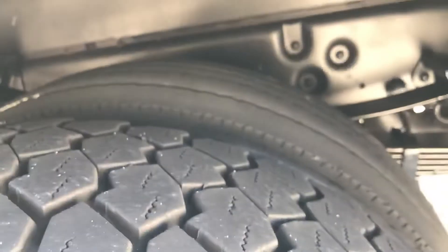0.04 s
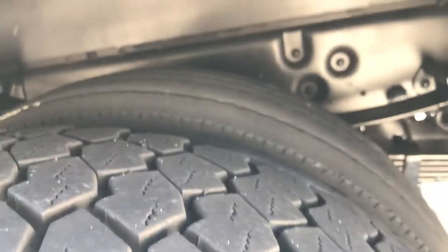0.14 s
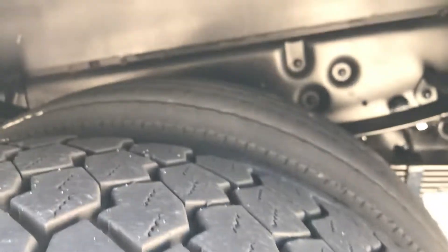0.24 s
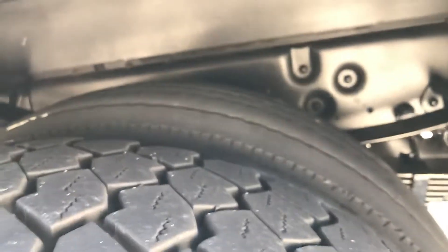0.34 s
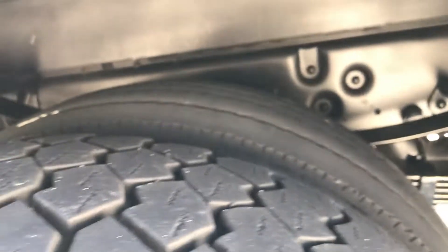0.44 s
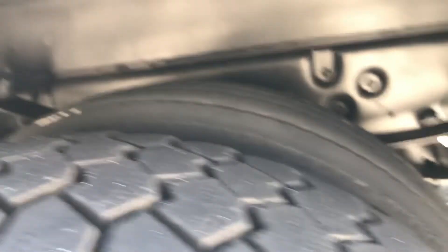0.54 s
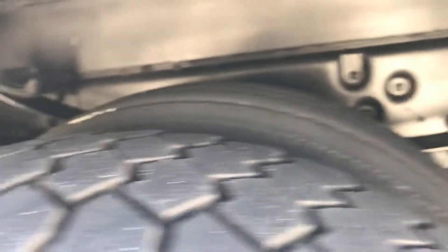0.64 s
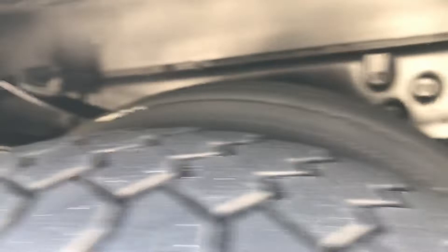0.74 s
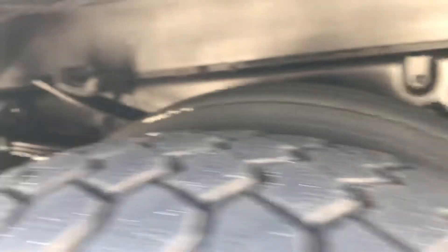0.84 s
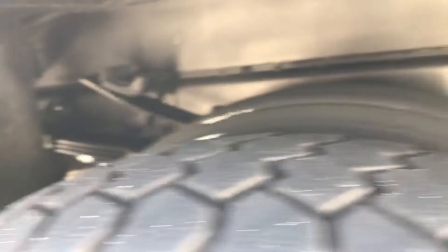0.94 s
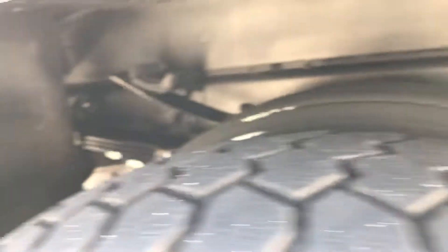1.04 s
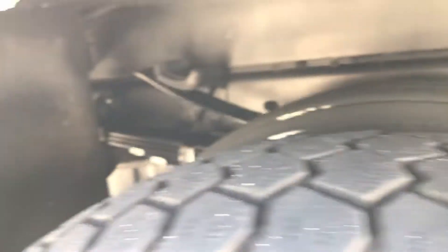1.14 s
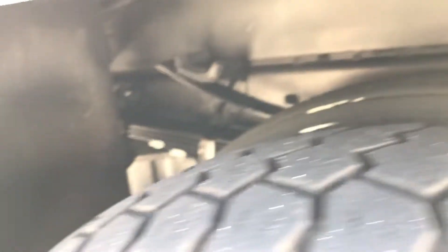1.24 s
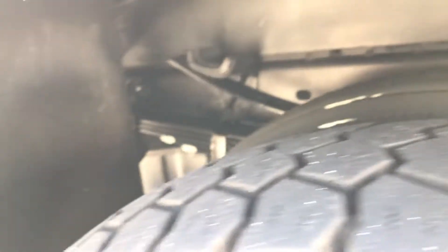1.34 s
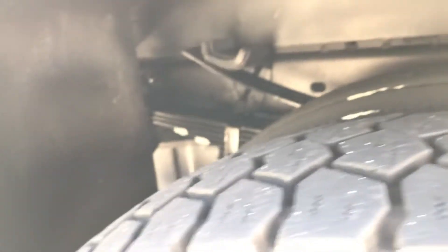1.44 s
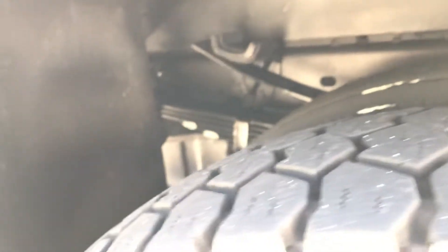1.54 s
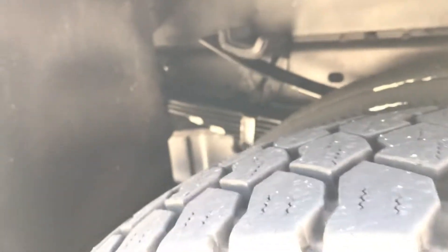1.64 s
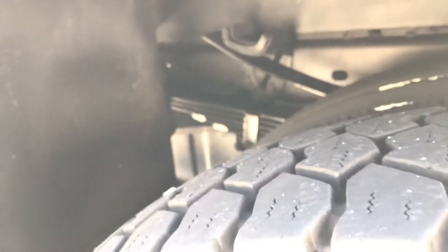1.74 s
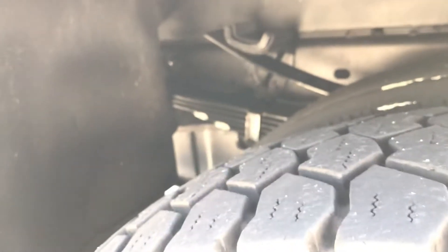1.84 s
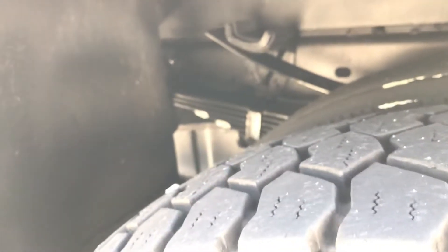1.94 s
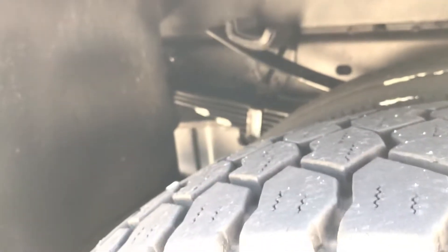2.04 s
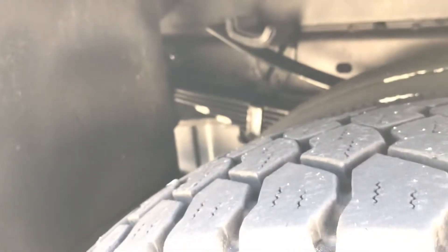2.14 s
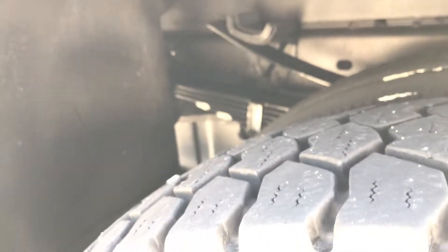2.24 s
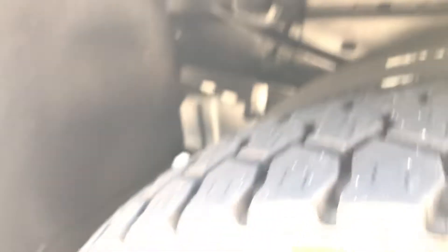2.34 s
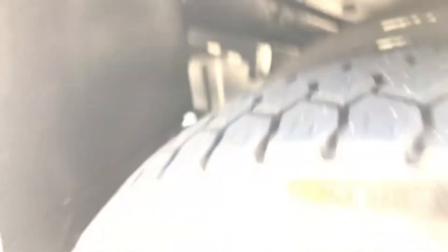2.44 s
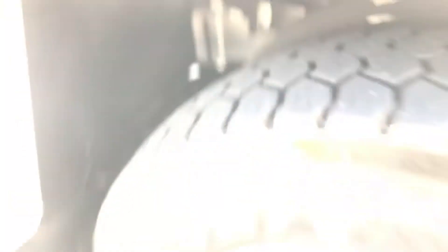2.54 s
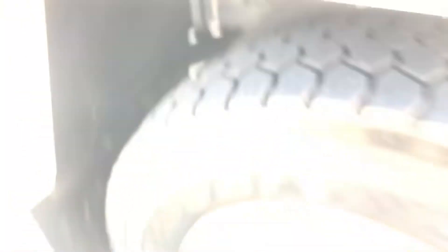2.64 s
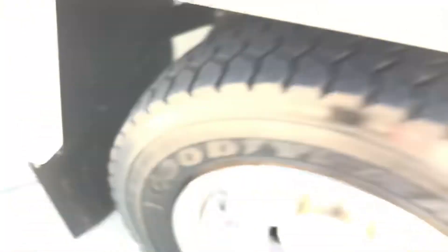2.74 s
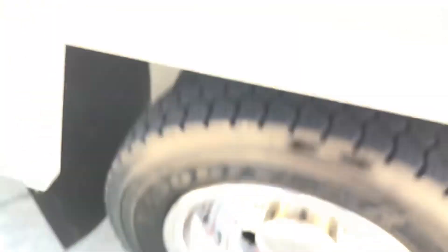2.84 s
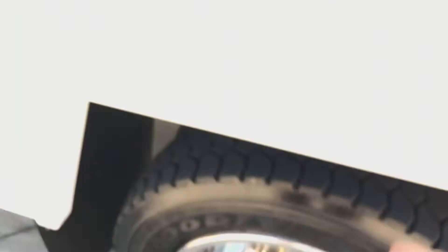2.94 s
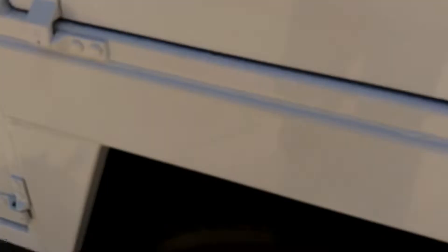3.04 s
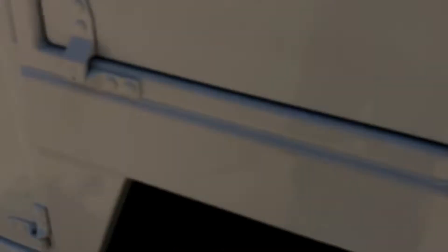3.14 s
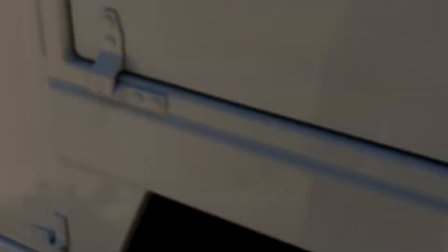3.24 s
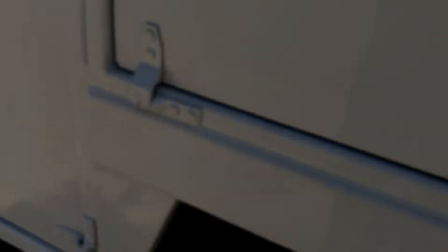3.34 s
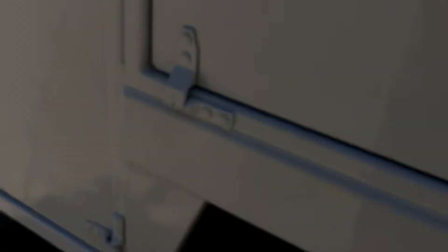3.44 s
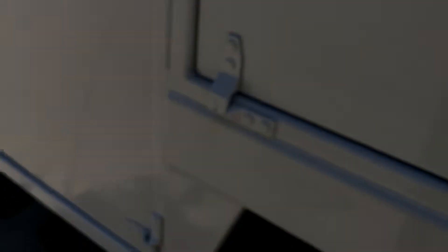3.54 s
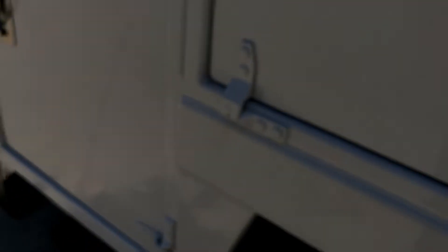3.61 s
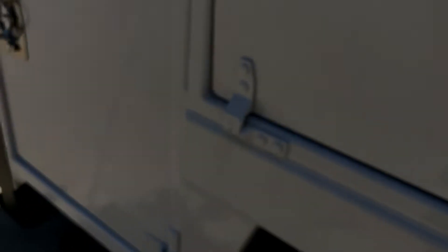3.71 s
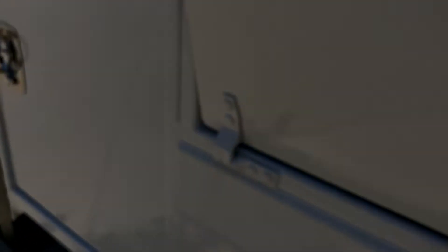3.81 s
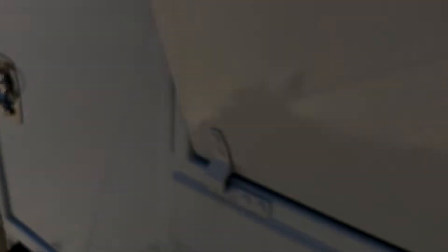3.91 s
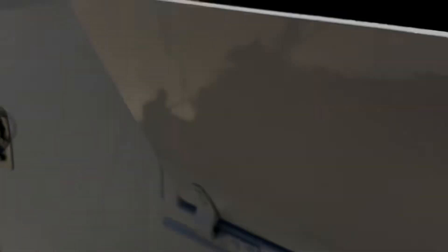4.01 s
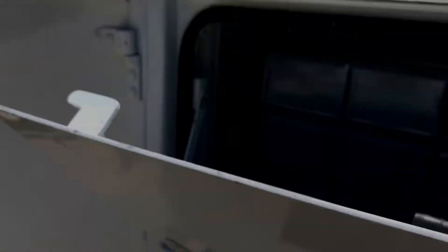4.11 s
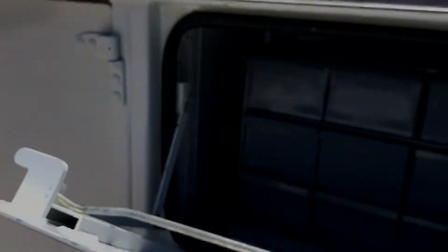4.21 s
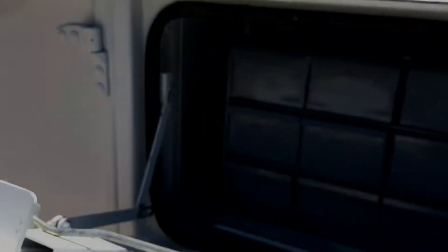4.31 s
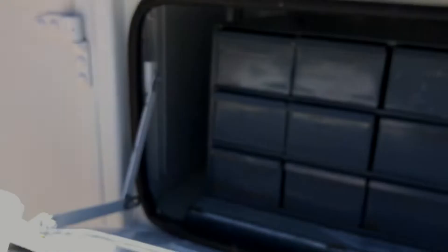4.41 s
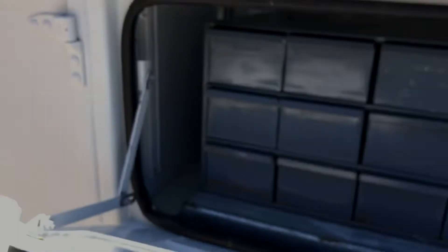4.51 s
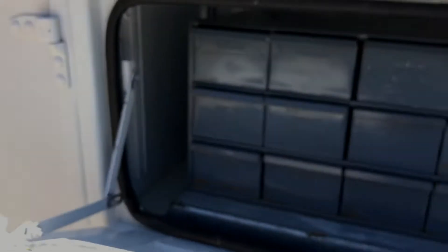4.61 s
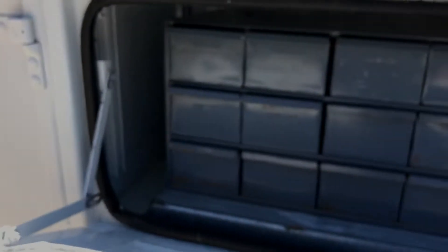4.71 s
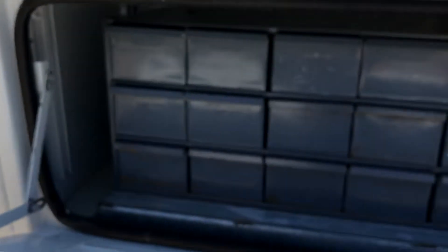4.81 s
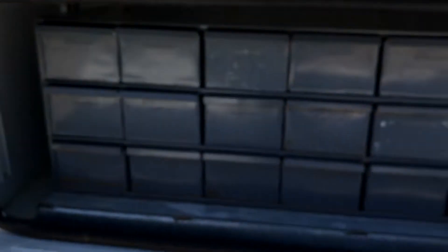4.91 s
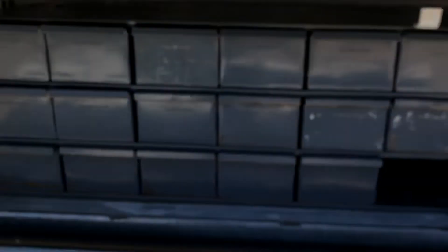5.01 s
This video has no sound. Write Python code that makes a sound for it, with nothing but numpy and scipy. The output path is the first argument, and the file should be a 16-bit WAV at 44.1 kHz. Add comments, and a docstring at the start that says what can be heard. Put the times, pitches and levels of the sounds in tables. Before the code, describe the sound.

A quiet outdoor yard with small birds whistling and chirping, near and far, and one distant echoing clack early on. Dull wind and handling bumps brush the handheld phone microphone. Past three seconds a close metal latch clicks, then snaps in a bright, dense clatter with hollow panel thumps. The door drops onto its stay with a lower thud and short squeak, followed by faint ticks and a fading yard echo.

```python
"""A hand works the latch of a metal side compartment on a parked truck: it snaps free and the door swings
down, thumps on its stay, and the stay squeaks. Contacts are filtered noise bursts that ring sheet-metal modes;
thuds are half-sine pushes into the door's low modes; the squeak is gated partials. All echo round the yard.
Birds whistle as gliding sines with wall and tree echoes; clacks from across the yard are ringing noise bursts.
Shaped noise gives still air, breeze, sleeve rustle and the buffets of air and hand on a phone's microphone."""
import sys
import numpy as np
from scipy import signal
from scipy.fft import rfft, irfft
from scipy.io import wavfile
from scipy.ndimage import uniform_filter1d

SR = 44100
rng = np.random.default_rng(int(sys.argv[2]) if len(sys.argv) > 2 else 0)


def wrap_up_sound(samples):
    """Save the sound to the file named by the first command line argument, as 16-bit audio."""
    columns = np.atleast_2d(samples).T
    # keep every value between -1 and 1, then stretch to whole-number steps
    tamed = np.clip(columns, -1, 1)
    steps = np.round(tamed * 32767).astype(np.int16)
    wavfile.write(sys.argv[1], SR, steps)


N = 223258
T = np.arange(N) / SR


def undb(db):
    """Level law: an amplitude gain is ten to the power of dB / 20."""
    return 10 ** (np.asarray(db) / 20)


def unit(x):
    """Normalisation of power: scale to rms 1."""
    return x / np.sqrt(np.mean(x ** 2))


def curve(rows):
    """Envelope: gain over time, interpolated in dB between rows of t/s, level/dB."""
    return undb(np.interp(T, *np.transpose(rows)))


def add(out, s, x):
    """Superposition: mix x into out from time s."""
    i = max(int(s * SR), 0)
    out[i:i + len(x)] += x[:max(N - i, 0)]


def ring(x, response):
    """Convolution: the response of a linear system to x."""
    return signal.fftconvolve(x, response)[:len(x)]


def colour(x, points, size=4096):
    """Minimum-phase filtering: a causal filter of unit energy through points of f/Hz, level/dB."""
    hz, db = np.transpose(points)
    f = np.maximum(np.fft.rfftfreq(size, 1 / SR), 1)
    log_gain = np.log(undb(np.interp(np.log(f), np.log(hz), db)))
    cepstrum = irfft(log_gain)
    # folding the cepstrum onto positive time makes the filter causal
    cepstrum[1:size // 2] *= 2
    cepstrum[size // 2 + 1:] = 0
    h = irfft(np.exp(rfft(cepstrum)))
    return ring(x, h / np.linalg.norm(h))


def noise(points, count=N):
    """Shaped random noise: white noise filtered to the given spectrum, at rms 1."""
    return unit(colour(rng.standard_normal(count), points))


def fade(t, t60):
    """Exponential decay: 60 dB down at t60."""
    return np.exp(-np.log(1000) * t / t60)


def modes(table):
    """Modal superposition: damped sines with alternating signs form an impulse response of unit energy."""
    t = T[:SR]
    h = np.zeros(len(t))
    for k, (hz, db, t60) in enumerate(table):
        h += (-1) ** k * undb(db) * fade(t, t60) * np.sin(2 * np.pi * hz * t)
    return h / np.linalg.norm(h)


def tail(points, t60, build_s):
    """Diffuse reverberation: shaped noise that builds up and dies away, with unit energy."""
    t = T[:2 * SR]
    h = noise(points, count=len(t)) * fade(t, t60) * (1 - np.exp(-t / build_s))
    return h / np.linalg.norm(h)


def jitter(count, size):
    """Low-pass random fluctuation: a smooth wander of rms 1, about size samples slow."""
    once = uniform_filter1d(rng.standard_normal(count), size)
    return unit(uniform_filter1d(once, size))


def bouts(rows, rise_s, fall_s):
    """Exponential swell and decay: gain that rises to each row's level, holds from start to end, and dies."""
    gain = np.zeros(N)
    for start, end, db in rows:
        before, after = np.minimum(T - start, 0), np.maximum(T - end, 0)
        gain += undb(db) * np.exp(before / rise_s - after / fall_s)
    return gain


def whistle(hz, gain, waver):
    """Frequency modulation: a near-sine note with soft ends, wavering in pitch and broken up in strength."""
    wobble = 1 + waver * jitter(len(hz), size=130)
    gain = gain * undb(2.8 * jitter(len(hz), size=350))
    tone = np.sin(2 * np.pi * np.cumsum(hz * wobble) / SR)
    return tone * gain * signal.windows.tukey(len(hz), .35)


# held bird notes, and one short tick near 1.6 kHz:
# [start t/s, length t/s, nominal f/Hz, relative level/dB]
LEVEL_TONES = [(0.008, 0.098, 2528, -58), (0, 0.19, 3464, -70.5), (0.133, 0.016, 2660, -60.5),
               (0.239, 0.036, 4025, -64), (0.384, 0.044, 4060, -67.5), (0.409, 0.036, 2750, -68.5),
               (0.996, 0.039, 4117, -64.5), (1.196, 0.042, 4080, -69.5), (1.409, 0.027, 4194, -65.5),
               (1.519, 0.12, 7330, -71), (2.794, 0.012, 1640, -60.5)]
# arched notes of one bird: [t/s, relative level/dB]
ARCHED_NOTES = [(2.797, -64), (3.0, -63), (3.197, -61.5), (3.384, -65)]
# chirps that drop fast and level out: [start t/s, length t/s, start f/Hz, end f/Hz, relative level/dB]
FALLING_CHIRPS = [(0.273, 0.12, 7040, 5560, -59), (0.51, 0.039, 2020, 1930, -66),
                  (1.01, 0.0256, 3400, 2650, -70), (1.093, 0.049, 2750, 1970, -68),
                  (1.356, 0.043, 4100, 2480, -65.5), (1.444, 0.07, 2900, 2050, -63.5),
                  (1.565, 0.034, 2230, 1855, -69)]
# a small bird's thin rising calls: [t/s]
RISING_PEEPS = [.195, .555, .765, 1.165, 1.365]
# a second bird's falling notes, mostly in pairs: [t/s, relative level/dB]
FALLING_SLURS = [(1.747, -72.5), (1.825, -69), (2.066, -65), (2.137, -62.5), (2.337, -63.5), (2.408, -62),
                 (2.636, -69), (2.705, -65), (2.932, -67.5), (3.0, -63.5), (3.194, -64.5), (3.435, -66.5)]
ARCH_S, ARCH_HZ, ARCH_SAG_HZ = 0.051, 2530, 307  # length, top pitch, drop at both ends
SLUR_S, SLUR_TOP_HZ, SLUR_END_HZ = .132, 4420, 1660
SLUR_BEND = 0.513  # how much steeper the fall is halfway


def calls():
    """Tones and glides: near birds sing held notes, arches, chirps, peeps and slurs, and one tick sounds."""
    song = np.zeros(N)
    for s, length, hz, db in LEVEL_TONES:
        add(song, s, whistle(np.full(int(length * SR), hz), undb(db), waver=0.0075))

    arch = ARCH_HZ - ARCH_SAG_HZ * np.linspace(-1, 1, int(ARCH_S * SR)) ** 2
    for s, db in ARCHED_NOTES:
        add(song, s, whistle(arch, undb(db), waver=.006))

    for s, length, start, end, db in FALLING_CHIRPS:
        left = np.linspace(1, 0, int(length * SR))
        add(song, s, whistle(end + (start - end) * left ** 2, undb(db), waver=0.015))

    for s in RISING_PEEPS:
        add(song, s, whistle(np.linspace(7050, 8050, SR // 25), undb(-73.5), waver=0.031))

    u = np.linspace(0, 1, int(SLUR_S * SR))
    fall = u - SLUR_BEND * np.sin(2 * np.pi * u) / (2 * np.pi)
    slur = SLUR_TOP_HZ + (SLUR_END_HZ - SLUR_TOP_HZ) * fall
    for s, db in FALLING_SLURS:
        add(song, s, whistle(slur, undb(db), waver=.028))
    return song


# spectrum of the far bird chorus: [f/Hz, level/dB]
CHORUS_SPECTRUM = [(1200, -20), (1900, -4.5), (2700, -7.5), (3200, -5), (4000, -3.5), (4800, -6.5)]


def chorus(count):
    """Incoherent summation: many short far chirps overlap, half clear and half smeared into a wash."""
    out = np.zeros(N)
    for when, pitch, length, glide, distance in rng.random((count, 5)):
        u = np.linspace(-1, 1, int(0.02 * (1 + length) * SR))
        hz = (1700 + 2700 * pitch) * (1 + 0.19 * (glide - .5) * u)
        add(out, when * N / SR, whistle(hz, undb(-9 * distance), waver=.02))
    # played twice, keeping the second pass, so the wash is already full at the start
    smeared = ring(np.tile(out, 2), tail(CHORUS_SPECTRUM, t60=0.92, build_s=0.0025))[N:]
    clear = colour(out, CHORUS_SPECTRUM)
    return unit(unit(smeared) + unit(clear))


# spectrum of the birds' echoes: [f/Hz, level/dB]
BIRD_ECHO_SPECTRUM = [(1000, 1), (9000, -9.5)]
# bouts of the far chorus: [start t/s, end t/s, relative level/dB]
CHORUS_BOUTS = [(-.1, .03, -56), (.43, .58, -62.5), (.62, .82, -63), (2.3, 3.7, -68.5)]
CHORUS_LULL_DB, BOUT_RISE_S, BOUT_FALL_S = -75.5, 0.091, 0.065  # lull level is relative, like the bouts


def birds():
    """Reflection and scattering: walls and trees echo the calls, over a far chorus that comes in bouts."""
    song = calls()
    walls = ring(song, tail(BIRD_ECHO_SPECTRUM, t60=0.077, build_s=0.0017))
    trees = ring(song, tail(BIRD_ECHO_SPECTRUM, t60=0.58, build_s=0.0016))
    strength = undb(CHORUS_LULL_DB) + bouts(CHORUS_BOUTS, BOUT_RISE_S, BOUT_FALL_S)
    far = chorus(count=450) * strength
    return undb(0.34) * song + undb(-5.0) * walls + undb(-3) * trees + undb(-5.5) * far


# spectrum of still air: [f/Hz, level/dB]
AIR_SPECTRUM = [(20, -6), (70, -2.5), (240, -10), (500, -23), (1500, -30.5), (7000, -38), (16000, -44.5)]
# strength of the breeze rumble: [t/s, relative level/dB]
BREEZE_LEVEL = [(0.0, -59.5), (0.32, -65), (1.36, -59), (2.52, -52), (2.98, -54), (3.29, -46),
                (3.81, -43.5), (4.15, -56.5), (5.05, -50)]
# spectrum of the breeze rumble: [f/Hz, level/dB]
BREEZE_SPECTRUM = [(20, -23.5), (55, 7.5), (90, -3.5), (160, -6.5), (280, -10), (500, -25.5), (1200, -62.5)]
# the sleeve moves: [start t/s, end t/s, relative level/dB]
SLEEVE_MOVES = [(2.66, 3.35, -66), (3.5, 3.95, -61)]
SLEEVE_RISE_S, SLEEVE_FALL_S = 0.072, 0.26


def outdoors():
    """Broadband noise: steady still air, a low gusting breeze and the rustle of a sleeve."""
    cloth = noise([(400, -3.0), (1500, 4.0), (6000, -7.0), (15000, -15.0)])
    rustle = cloth * undb(2 * jitter(N, size=300))
    gusts = undb(2 * jitter(N, size=1500))
    breeze = undb(3.5) * curve(BREEZE_LEVEL) * gusts * noise(BREEZE_SPECTRUM)
    sleeve = bouts(SLEEVE_MOVES, SLEEVE_RISE_S, SLEEVE_FALL_S) * rustle
    return undb(-57.5) * noise(AIR_SPECTRUM) + breeze + sleeve


# clacks from across the yard: [t/s, relative level/dB]
CLACK_TIMES = [(0.844, -41.5), (2.209, -58)]
# spectrum of a clack's burst: [f/Hz, level/dB]
CLACK_SPECTRUM = [(650, -37), (950, -14.5), (1500, -18.5), (2500, -20), (3400, -12.5), (5700, -9.5),
                  (16000, -34)]
# resonances of the clacks: [f/Hz, level/dB, t60 t/s]
CLACK_RESONANCES = [(1720, -1, 0.39), (3434, -5, 0.27), (4840, -16, .23), (5950, -7, .18), (8538, -20, .2)]


def clacks():
    """Propagation and reverberation: distant knocks arrive smeared, with a longer and duller echo."""
    t, out = T[:SR], np.zeros(N)
    for s, db in CLACK_TIMES:
        burst = noise(CLACK_SPECTRUM, count=SR) * np.clip(t / 0.0059, 0, 1) * fade(t, 0.2)
        rung = unit(ring(burst, modes(CLACK_RESONANCES))) * burst.std()
        wash = noise([(600, -50), (1000, -5.5), (1600, -4.5), (3500, -14.5), (9000, -62)], count=SR)
        echo = wash * np.clip(t / 0.02, 0, 1) * fade(t, 0.55)
        add(out, s, undb(db) * (burst + undb(-4.5) * rung + undb(-7.5) * echo))
    return out


# buffets on the microphone: [centre t/s, level/dB, Gaussian half length t/s, upper edge f/Hz]
MIC_BUFFETS = [(1.257, -43.5, 0.01, 205), (1.32, -35.5, 0.0036, 295), (1.768, -31, 0.014, 255),
               (1.791, -29, 0.0055, 340), (1.824, -31.5, 0.021, 310), (2.104, -36.5, 0.0068, 265),
               (2.486, -41.5, 0.059, 162), (2.674, -35.5, 0.03, 227), (2.745, -37, 0.018, 216),
               (3.089, -29, 0.016, 139), (3.212, -24, 0.015, 204), (3.247, -30, 0.017, 370),
               (3.471, -35.5, 0.014, 132), (5.012, -38.5, 0.024, 167)]


def buffets():
    """Turbulent pressure: short dull bursts of low noise swell and sink on the microphone port."""
    out, t = np.zeros(N), T[:SR // 2] - 1 / 4
    for s, db, half, edge_hz in MIC_BUFFETS:
        swell = np.exp(-.5 * (t / half) ** 2)
        low_band = [(25, -16), (70, 0), (edge_hz / 2, 0), (edge_hz, -6)]
        roll_off = [(edge_hz * 1.805, -25), (edge_hz * 4, -75)]
        eddy = swell * noise(low_band + roll_off, count=len(t))
        add(out, s + t[0], undb(db) * eddy * swell.std() / eddy.std())
    return out


def contact_burst(decay_s, grain_db, sing_db):
    """Stick-slip friction: a shower of uneven slips briefly sings at pitches set by the spot that rubs."""
    t = T[:SR // 6]
    slips = rng.standard_normal(len(t)) * undb(grain_db * jitter(len(t), size=20))
    pitches = np.geomspace(2000, 15000, num=12) * np.exp(0.13 * rng.standard_normal(12))
    spot = modes([(hz, 0, .014) for hz in pitches])
    slips = unit(slips) + undb(sing_db) * unit(ring(slips, spot))
    onset = 1 - np.exp(-t / (.14 * decay_s))  # long contacts also start more softly
    slips = slips * np.exp(-t / decay_s) * onset
    return slips * np.sqrt(decay_s * SR / 2) / np.linalg.norm(slips)


# blows of latch and door: [t/s, relative level/dB, brightness level/dB per octave]
METAL_BLOWS = [(3.282, -27, -.5), (3.291, -28.5, -3.5), (3.422, -45, -6.5), (3.5177, -23, -2.5),
               (3.5945, -14.5, 0), (3.613, -19, -1.5), (3.6205, -11, 2.5), (3.629, -17, 4),
               (3.652, -32, -.5), (3.799, -40, -3), (3.865, -29.5, -0.5), (3.918, -21.5, 1.5)]
# scrapes and light ticks of bolt, hinge and stay:
# [t/s, relative level/dB, decay t/s, brightness level/dB per octave]
SCRAPES_AND_TICKS = [(3.274, -36.5, 0.0069, -7.5), (3.54, -42.5, 0.012, -1), (3.572, -36.5, 0.034, -2.5),
                     (3.5865, -18, 0.019, -0.5), (3.602, -20.5, 0.017, 7), (3.688, -39, 0.0059, -1),
                     (3.852, -44.5, 0.013, -0.5), (3.890, -31.5, 0.017, -2), (3.906, -33, 0.0057, 1),
                     (3.984, -32.5, 0.0068, -1.5), (4.005, -31.5, 0.0068, -2.5), (4.120, -49.5, 0.021, -3),
                     (4.142, -41, 0.015, -4), (4.195, -51.5, 0.07, -9), (4.272, -53.5, 0.0063, -1.5),
                     (4.422, -57, 0.01, -4.5)]
BLOW_DECAY_S, REBOUND_S, REBOUND_DB = 0.0043, .009, -12  # a rebound follows its blow, at a lower level


def contacts():
    """Impact and rebound: lists each blow, its weaker bounce and each scrape or tick as a metal contact."""
    rows = list(SCRAPES_AND_TICKS)
    for s, db, tilt in METAL_BLOWS:
        rows.append((s, db, BLOW_DECAY_S, tilt))
        rows.append((s + REBOUND_S, db + REBOUND_DB, BLOW_DECAY_S, tilt))
    return rows


# modes of sheet metal and latch: [f/Hz, level/dB]
SHEET_MODES = [(328, 6), (1199, -2), (1360, -4.5), (1444, 5), (1504, -3.5), (1749, 0), (1894, -4.5),
               (1958, -3.5), (2080, -3), (2207, 0), (2292, 3.5), (2566, -1.5), (2826, 0), (3238, -2),
               (3551, -2), (3625, 1), (4516, -0.5), (5609, 2), (5880, -1.5), (6594, 2), (7198, 3.5),
               (12100, 8), (15600, 4.5)]
# spectrum of a contact's crack, before its brightness tilt: [f/Hz, level/dB]
CRACK_SPECTRUM = [(120, -15.5), (330, -8.5), (850, -13), (1400, -6.5), (2300, -8), (3700, -10),
                  (4400, -11.5), (4950, -14.5), (6600, -13.5), (7600, -22), (8150, -18), (9300, -22.5),
                  (16000, -27.5)]
# spectrum of the chattering panels: [f/Hz, level/dB]
RATTLE_SPECTRUM = [(330, 3.5), (650, 4.5), (1400, 0.5), (3000, -5.5), (7000, -14), (15000, -17.5)]
METAL_T60_S, METAL_DAMPING = 0.16, 0.36  # ring time at 1 kHz; higher modes die sooner by this power of frequency


def latch():
    """Impulsive excitation: contacts crack; the harder ones ring the sheet metal, and the panels chatter on."""
    force, shake = np.zeros(N), np.zeros(N)
    hardest = max(row[1] for row in METAL_BLOWS)
    for s, db, decay_s, tilt in contacts():
        hardness = [(hz, tilt * np.log2(hz)) for hz in (400, 14000)]
        crack = colour(contact_burst(decay_s, grain_db=4.0, sing_db=-6.5), CRACK_SPECTRUM)
        blow = colour(crack, hardness)
        blow = undb(db) * blow * np.sqrt(decay_s * SR / 2) / np.linalg.norm(blow)
        add(force, s, blow)
        add(shake, s, blow * undb(0.71 * (db - hardest)))  # weak contacts barely shake the sheet

    sheet = modes([(hz, db, METAL_T60_S * (hz / 1000) ** -METAL_DAMPING) for hz, db in SHEET_MODES])
    metal = unit(ring(shake, sheet)) * force.std()
    loose = undb(3 * jitter(N, size=100))
    chatter = loose * ring(force, tail(RATTLE_SPECTRUM, t60=0.2, build_s=0.0076))
    return undb(3) * force + undb(-6.5) * metal + undb(-13.5) * chatter


# shoves that thump the whole door: [t/s, relative level/dB, push length t/s]
DOOR_SHOVES = [(3.284, -23.5, 0.0016), (3.423, -23, 0.0032), (3.518, -17.5, 0.0017), (3.593, -19.5, 0.0028),
               (3.6163, -13, .0016), (3.647, -13, 0.003), (3.801, -18.5, 0.0036), (3.919, -13, .0008),
               (3.991, -25.5, 0.0044)]
# low modes of the door in its frame: [f/Hz, level/dB, t60 t/s]
SHUT_DOOR_MODES = [(79.8, -1, 0.49), (138, -2, 0.15), (219.6, 2, 0.095), (324.9, 3, .17), (490, 0, 0.032)]
# low modes of the door once it hangs free: [f/Hz, level/dB, t60 t/s]
FREE_DOOR_MODES = [(55.15, -2.5, 0.24), (141.4, -0.5, 0.1), (250, -1.5, 0.053), (418, 1.5, .04),
                   (557, 0.5, 0.025)]
DOOR_FREE_S = 3.75  # shoves from here on sound the free door


def thuds():
    """Forced modal response: half-sine pushes boom in the door, deeper when free; longer pushes are duller."""
    out = np.zeros(N)
    for s, db, length in DOOR_SHOVES:
        push = np.sin(np.pi * np.minimum(T[:SR] / length, 1))
        body = modes(SHUT_DOOR_MODES if s < DOOR_FREE_S else FREE_DOOR_MODES)
        add(out, s, undb(db) * ring(push / push.sum(), body / np.abs(body).max()))
    return out


# partials of the squeaking stay: [nominal f/Hz, level/dB]
STAY_PARTIALS = [(1109, -19.5), (1812, -1), (2089, -17.5), (2750, -17)]
SLIP_S = .0135  # time from one slip of the pivot to the next


def squeak(s, db, second_db, ring_db, t60):
    """Stick-slip oscillation: the stay's pivot slips twice and sings on partials that ring on briefly."""
    t = T[:SR // 6]
    first, second = (np.exp(-(2 * (t / SLIP_S - k) - 1) ** 4) for k in range(2))
    slips = first + undb(second_db) * second
    after = ring(slips, fade(t, t60)) / slips.sum()
    tone = np.zeros(len(t))
    for hz, part_db in STAY_PARTIALS:
        pitch = hz * (1 + .014 * jitter(len(t), size=12))
        tone += undb(part_db) * np.sin(2 * np.pi * np.cumsum(pitch) / SR)
    out = np.zeros(N)
    add(out, s, undb(db) * (slips + undb(ring_db) * after) * tone)
    return out


# spectrum of the yard's echo: [f/Hz, level/dB]
YARD_SPECTRUM = [(100, 2), (550, 3), (1300, -8), (3500, -3.5), (7000, -16.5), (15000, -25.5)]


def yard_echo(door):
    """Diffuse reverberation: the yard returns the door's sound as a slowly dying tail."""
    return undb(-33.5) * ring(door, tail(YARD_SPECTRUM, t60=1.8, build_s=0.031))


def scene():
    """Superposition: the door with its echo in the yard, and everything around it."""
    surroundings = birds() + outdoors() + clacks() + buffets()
    door = latch() + thuds() + squeak(s=3.992, db=-29.5, second_db=6.5, ring_db=-1, t60=0.1)
    return (surroundings + door + yard_echo(door))[None]


PEAK_CEILING, TOP_HZ = .7, 15800  # ceiling in full-scale units before the top cut


def record(dry):
    """Band limiting and saturation: the phone drops deep bass, rounds the highest peaks and cuts the top."""
    thin = signal.sosfilt(signal.butter(2, 35, "high", fs=SR, output="sos"), dry)
    rounded = thin / (1 + (thin / PEAK_CEILING) ** 4) ** (1 / 4)
    return signal.sosfilt(signal.ellip(10, .2, 70, TOP_HZ, fs=SR, output="sos"), rounded)


dry = scene()
out = record(dry)
wrap_up_sound(out)
```